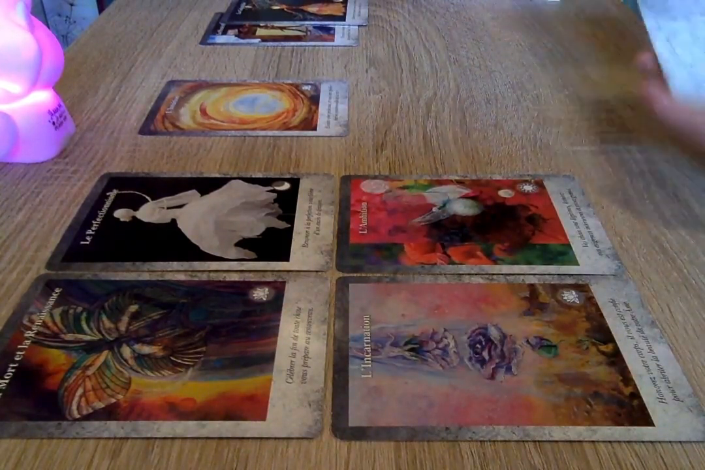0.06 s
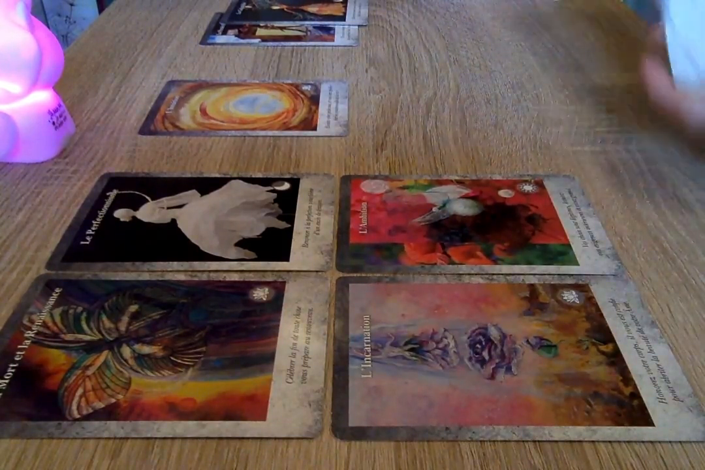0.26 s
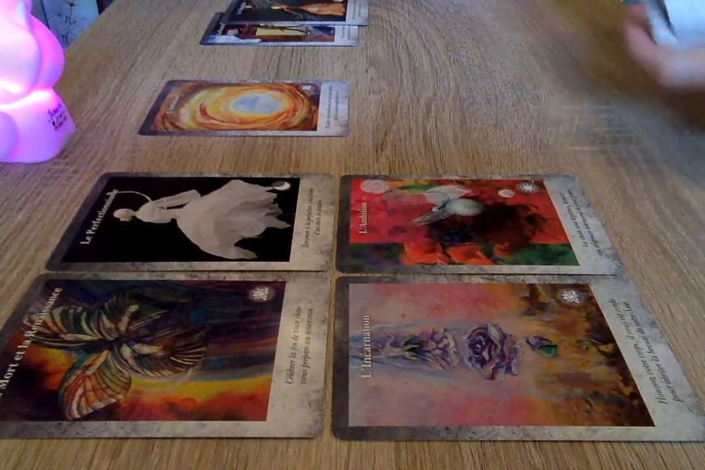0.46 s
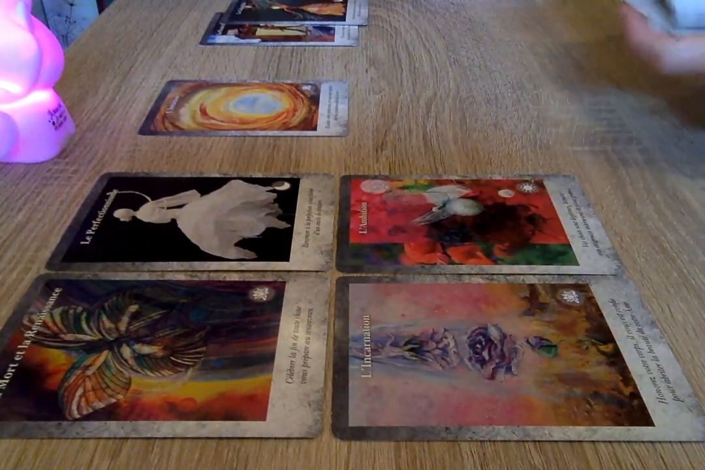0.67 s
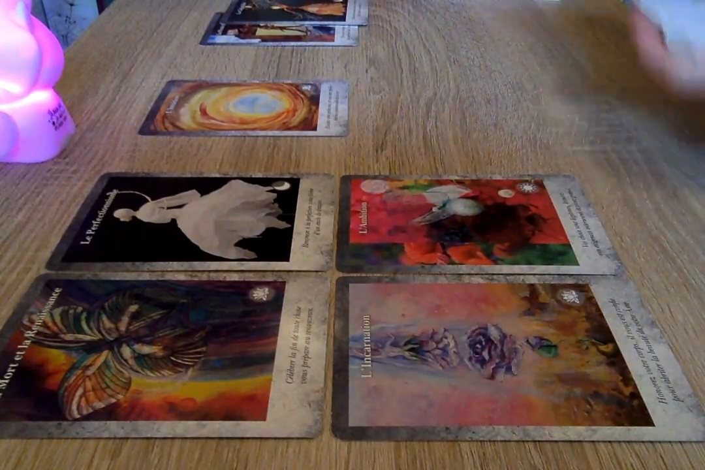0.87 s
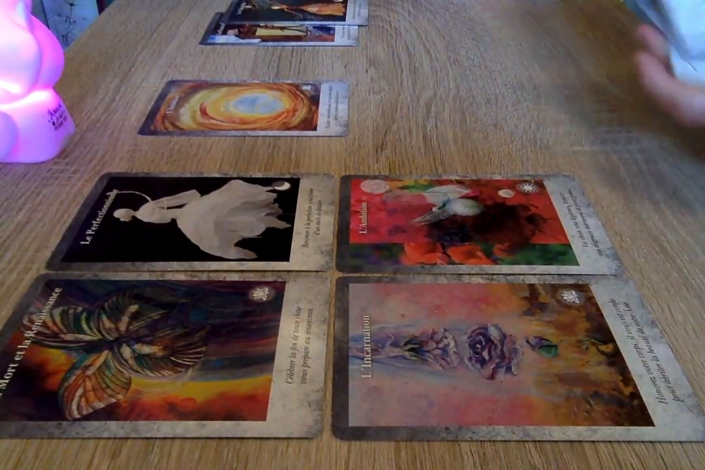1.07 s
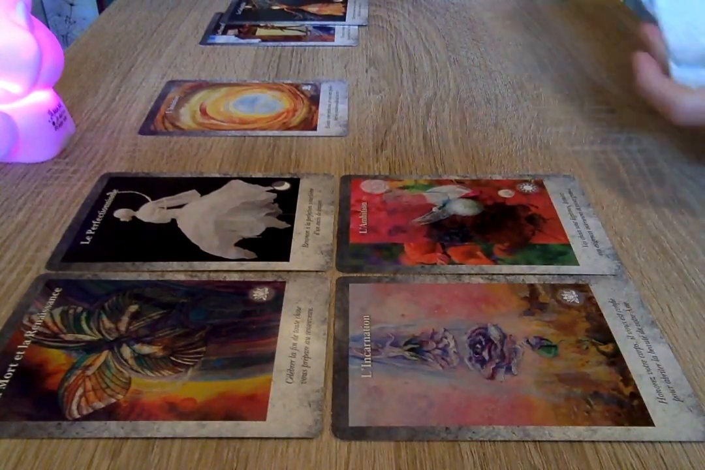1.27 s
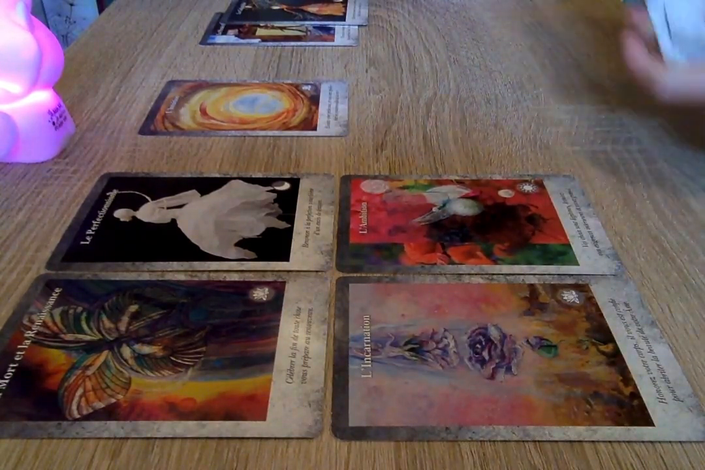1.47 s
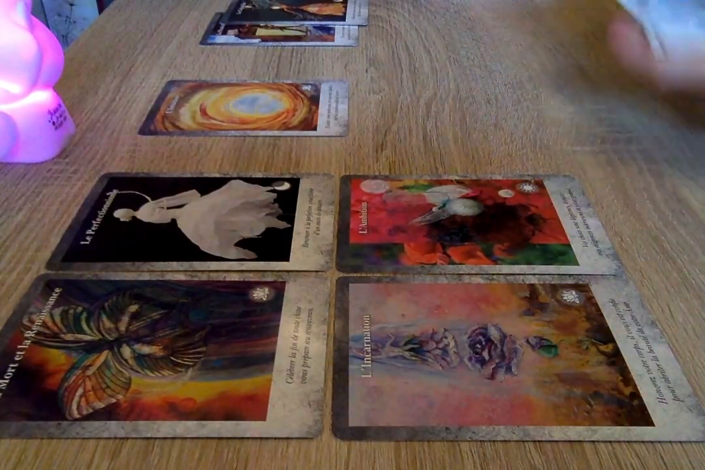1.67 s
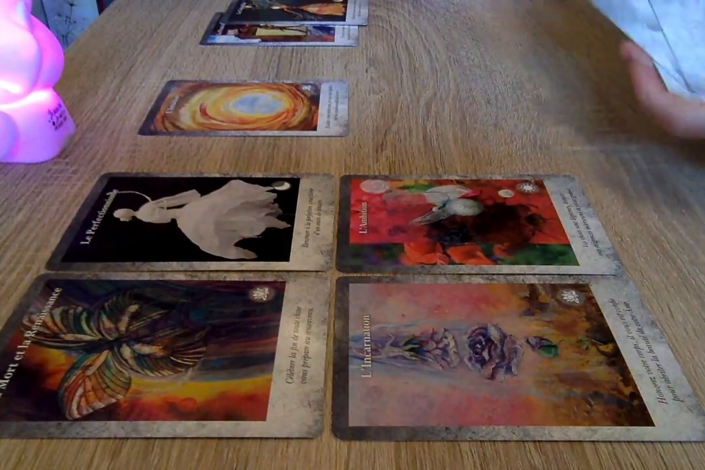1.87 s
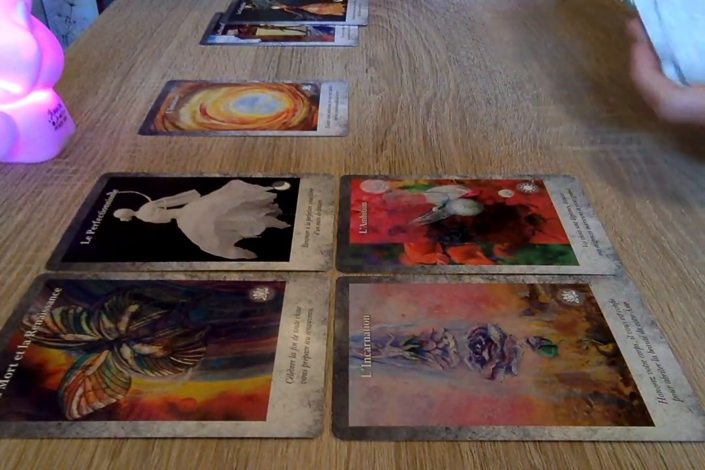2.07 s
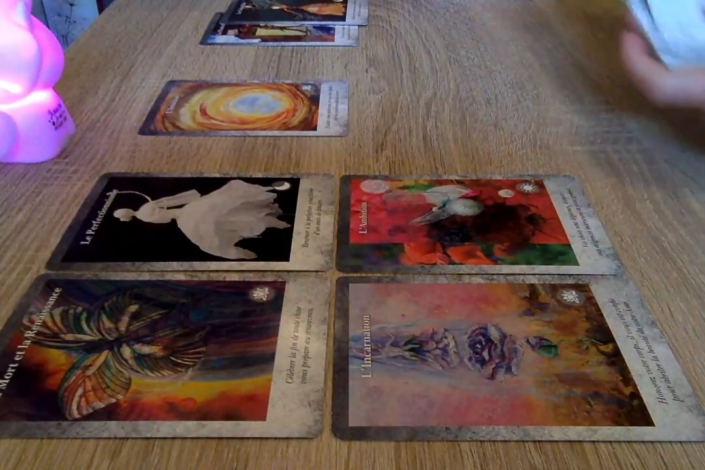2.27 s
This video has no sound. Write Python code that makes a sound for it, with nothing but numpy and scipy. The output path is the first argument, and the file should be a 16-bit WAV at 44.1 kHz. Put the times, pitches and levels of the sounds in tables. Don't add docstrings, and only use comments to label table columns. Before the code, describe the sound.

Cards shuffled overhand, close and dry, for about 2.3 seconds. Packets slide with brief hisses and slap down near 0.06, 0.3, 0.55 and 0.8 s, then at 1.04 s and with a sharp bright click at 1.15 s. Smaller flicks cluster from 1.25 to 1.45, a lull follows, then crisp snaps around 1.75-1.85, 2.0 and 2.1, fading to light touches. Short furnished-room response, nearly silent background.

```python
import sys
import numpy as np
from scipy import signal
from scipy.fft import rfft, irfft, next_fast_len
from scipy.io import wavfile
from scipy.ndimage import uniform_filter1d, map_coordinates

SR = 44100
rng = np.random.default_rng(int(sys.argv[2]) if len(sys.argv) > 2 else 0)


def invert_db(x):
    u = np.asarray(x, float) / 20
    return 10 ** u


def file_out(sig):
    cols = np.atleast_2d(sig).T
    lim = np.clip(cols, -1, 1)
    pcm = np.round(lim * 32767).astype(np.int16)
    wavfile.write(sys.argv[1], SR, pcm)


N = 102179

# f/Hz, level/dB
FLOOR_SPECTRUM = [(35, -44), (60, 4), (188, -9), (674, -11), (790, -12.5), (906, -8.5), (14000, -29)]
# f/Hz, time to fall 60 dB/s
ROOM_DECAY = [(150, 0.06), (1000, 0.4), (4000, 0.31), (14000, 0.25)]
# f/Hz, level/dB
ROOM_COLOUR = [(150, 6), (1000, 2), (4000, 4), (12000, -1)]
# t/s, peak level/dB, f/Hz
THUMPS = [(0.040, -37, 327), (0.057, -36.5, 290), (0.062, -35, 258), (0.283, -38, 225), (0.298, -25.5, 239),
          (0.308, -44, 305), (0.449, -50, 164), (0.548, -31, 222), (0.693, -41, 280), (0.700, -42.5, 210),
          (0.774, -32, 320), (0.79, -30.5, 206), (0.939, -49, 207), (0.946, -42, 148), (1.027, -41.5, 206),
          (1.037, -29.5, 346), (1.148, -29, 353), (1.219, -41, 194), (1.263, -40.5, 192), (1.28, -48, 220),
          (1.298, -40, 332), (1.333, -39.5, 258), (1.411, -41.5, 317), (1.437, -40, 346),
          (1.500, -41.5, 314), (1.731, -42.5, 343), (1.752, -42.5, 340), (1.821, -42.5, 293),
          (1.845, -40.5, 330), (1.857, -43.5, 318), (1.981, -53, 246), (2.101, -37.5, 250),
          (2.218, -43, 271), (2.242, -38.5, 240), (2.311, -42, 261)]
# t/s, peak level/dB, f/Hz
RINGS = [(.0434, -39, 715), (.0568, -36, 2340), (.0667, -26.5, 2150), (.0699, -32, 880),
         (.2139, -31.5, 925), (.2430, -35.5, 2050), (0.3, -22, 3400), (.3005, -27, 810),
         (.4639, -34.5, 2120), (.5485, -24, 2790), (.5614, -27, 950), (.6965, -33, 985), (.7082, -33, 2030),
         (.7510, -39, 1600), (.7590, -40, 1700), (.7697, -44, 1670), (.7952, -24, 2030), (.8003, -30, 2200),
         (.8130, -37, 1740), (.9372, -30, 2470), (.9415, -35, 1260), (1.0373, -27, 1820),
         (1.0413, -22, 1500), (1.1288, -31, 1860), (1.1403, -33, 750), (1.1440, -30, 2050),
         (1.1458, -29.5, 760), (1.1623, -35, 2170), (1.2416, -38, 3680), (1.2544, -32, 2050),
         (1.2723, -37, 1850), (1.2814, -36, 2260), (1.2947, -38, 2070), (1.2985, -44.5, 985),
         (1.2986, -36, 1960), (1.3331, -35, 2100), (1.333, -29.5, 2980), (1.4105, -34, 800),
         (1.4124, -34, 830), (1.4163, -45, 840), (1.4251, -40, 1950), (1.4393, -40, 1350),
         (1.4432, -34, 2770), (1.7290, -29, 3140), (1.7890, -26.5, 1900), (1.8286, -41, 2370),
         (1.8455, -21.5, 2490), (1.8558, -27, 1840), (1.8593, -29.5, 770), (1.9863, -31.5, 1010),
         (1.9864, -26, 2460), (1.9995, -43, 1960), (2.0465, -41, 900), (2.0458, -34, 2100),
         (2.0993, -21.5, 2250), (2.1004, -28.5, 1930), (2.1095, -52, 2150), (2.2901, -37.5, 1880),
         (2.3080, -45, 1300), (2.3160, -39.5, 1360)]
# t/s, body peak level/dB, body f/Hz, crack over body/dB, length/ms
LANDINGS = [(0.064, -24.5, 2200, 7, 4.3), (0.211, -22, 1680, -6.5, 6.2), (0.298, -21.5, 1630, -10, 4.2),
            (0.306, -20, 2100, 0.5, 4.8), (0.547, -23.5, 2630, -2.5, 5.9), (0.556, -20, 2400, -1.5, 6),
            (0.692, -27, 1530, -10, 5), (0.793, -16, 786, -8.5, 3.6), (0.934, -39.5, 2270, -12, 19),
            (1.036, -23, 784, -48, 8.4), (1.047, -27.5, 1710, -25, 5.7), (1.149, -19.5, 1730, -35, 4),
            (1.253, -28, 2200, -6.5, 7.7), (1.331, -24, 2080, -36.5, 4.5), (1.408, -41, 646, -4.5, 11),
            (1.727, -24, 675, -6, 4.5), (1.785, -25.5, 1150, -12, 8.4), (1.843, -20, 2500, -2, 2.96),
            (1.856, -29, 735, -1.5, 6.5), (1.985, -23, 2710, -14, 4.4), (2.043, -33, 775, -3.5, 4.6),
            (2.098, -23.5, 1980, -1, 3.6), (2.219, -32, 1870, 0.5, 6)]
# t/s, crack peak level/dB, body over crack/dB
TICKS = [(.463, -43, 1), (0.7118, -39, -14), (0.789, -17.5, 1), (.7946, -16, 8), (0.9558, -40.5, 14.5),
         (1.1501, -10.5, -14), (1.2148, -31, 5), (1.2407, -42, 7), (1.493, -26.5, -19.5), (1.501, -48, -28),
         (1.7455, -30, -22), (1.7571, -33, 9), (2.0067, -29, -15), (2.24, -28, -11)]
# t/s, peak level/dB, f/Hz, length/ms
NUDGES = [(0.006, -41.5, 1550, 70), (0.041, -33, 830, 49), (0.243, -32, 680, 11.5), (0.281, -30.5, 613, 14),
          (0.452, -40, 1270, 7.1), (0.492, -44.5, 1320, 21), (0.705, -35.5, 1900, 11),
          (0.757, -55, 1660, 3.2), (0.775, -23, 680, 9.3), (0.998, -45, 751, 15), (1.128, -31.5, 1100, 20),
          (1.281, -42, 1190, 23), (1.421, -36.5, 2050, 37), (1.748, -39, 580, 8.2),
          (1.978, -34, 1200, 10.4), (2.057, -36.5, 640, 15), (2.284, -38.5, 1200, 14)]
# f/Hz, level per Hz/dB
DECK_SPECTRUM = [(88, -16), (150, 1), (444, -0.5), (1120, -1.5), (2300, -3.5), (3320, -7.5), (5000, -30.5),
                 (6500, -17.5), (11000, -120)]
# f/Hz, level/dB
CRACK_SPECTRUM = [(2350, -22.5), (4300, -10.5), (5300, -5), (6300, -5.5), (7810, -5.5), (15500, -5)]
# start t/s, end t/s, end level/dB, swell from the start/dB
SLIDES = [(0, 0.063, -43, -6.5), (0.04, 0.062, -39.5, 3.5), (0.205, 0.241, -55.5, -13),
          (0.244, 0.299, -35, 31), (0.45, 0.472, -43, 3.5), (0.487, 0.54, -38.5, 42),
          (0.711, 0.716, -42.5, 21), (0.742, 0.804, -33, 24), (0.934, 0.954, -50.5, -32),
          (0.987, 1.04, -44.5, 8.5), (1.026, 1.058, -51, 9), (1.138, 1.153, -32, -1.5),
          (1.152, 1.186, -42.5, 11), (1.231, 1.304, -35, 10.5), (1.295, 1.334, -39, 7.5),
          (1.418, 1.45, -37.5, 1), (1.493, 1.505, -47, -11.5), (1.706, 1.719, -40, 4),
          (1.736, 1.776, -55, -13), (1.766, 1.814, -41.5, 22), (1.809, 1.845, -37, -6),
          (1.959, 1.992, -38, 11.5), (1.972, 2.046, -58.5, -5), (2.038, 2.066, -36, 37),
          (2.062, 2.1, -39.5, -3), (2.219, 2.238, -45, 2), (2.252, 2.297, -51, 8),
          (2.283, 2.315, -38.5, 20)]
# f/Hz, level/dB
HISS_SPECTRUM = [(2060, -35.5), (3500, -34.5), (4270, -14.5), (5250, -9.5), (7390, -3), (8010, -3),
                 (15500, -1.5)]
# f/Hz, level per Hz/dB
SCRAPE_SPECTRUM = [(88, 16), (150, 5), (524, -26.5), (1190, 4), (1470, -25), (2130, -6), (4000, -12.5),
                   (5200, -68.5), (8800, -120)]

FLOOR_DB = -63
ROOM_DB, ROOM_DELAY_S = -9.5, 0.003
THUMP_DB, THUMP_CYCLES = 7, 1.04
RING_DB, RING_CYCLES, RING_SAG = 0.65, 5, 0.08
BODY_DB, CRACK_DB, NUDGE_DB = -6.5, -3.5, -5
TICK_DB, TICK_BODY_DB, TICK_HZ, TICK_MS = -4.5, -8, 2100, 0.57
BODY_Q, BODY_SHARE_DB = 5.3, 1.5
SOFT_OVER_PITCH = 3.64
RAGGED_DB, RATTLE_DB = 2.5, 4.2
KNOCK_LEAD = 256
SCRAPE_DB, SCRAPE_GROWS = -10, 1
GRIT_DB, GRIT_PER_S, PATCH_DB = 3.5, 700, 1.6
TOUCH_S, LIFT_S, SWELL_BEND = 0.005, 0.0018, 2.28
EDGE_HZ, EDGE_PER_DB, EDGE_TOP_HZ = 3800, 0.3, 7600
BRIGHTER = 0.04
MIC_LOW_HZ, MIC_TOP_HZ, MIC_SHELF_DB = 96, 15900, -35
GATE_DB, GATE_SLOPE, GATE_S = -45.5, 0.62, 0.0059


def unit(x):
    return x / np.sqrt(np.mean(x ** 2) + 1e-20)


def along(points, hz):
    f, v = np.transpose(points)
    return np.interp(np.log(hz + 1), np.log(f + 1), v)


def filtered(x, response):
    m = next_fast_len(len(x) + 4096)
    spectrum = rfft(x, m) * response(np.fft.rfftfreq(m, 1 / SR))
    return irfft(spectrum, m)[:len(x)]


def noise(spectrum, size):
    return unit(filtered(rng.standard_normal(size), lambda hz: invert_db(along(spectrum, hz))))


def wobble(rate, size):
    knots = rng.standard_normal(size // 8)
    return map_coordinates(knots, [np.arange(size) * rate / SR])


def add(track, s, sound):
    part = track[round(s * SR):][:len(sound)]
    part += sound[:len(part)]


def noise_floor():
    return invert_db(FLOOR_DB) * noise(FLOOR_SPECTRUM, N)


def room(x):
    out, step = np.zeros(N), SR // 20
    for a in range(0, N, step):
        hz, t, z = signal.stft(rng.standard_normal(SR // 3), SR, nperseg=256)
        fall_db = 60 * t / along(ROOM_DECAY, hz)[:, None]
        fade = invert_db(along(ROOM_COLOUR, hz)[:, None] - fall_db)
        tail = signal.istft(z * fade, SR, nperseg=256)[1]
        answer = signal.fftconvolve(x[a:a + step], tail / np.linalg.norm(tail))
        add(out, a / SR + ROOM_DELAY_S, answer)
    return invert_db(ROOM_DB) * out


def thumps():
    out, t = np.zeros(N), np.arange(4096) / SR
    for s, db, hz in THUMPS:
        u = t * hz / THUMP_CYCLES
        push = 4 * u * np.exp(1 - 4 * u)
        swing = np.sin(2 * np.pi * hz * t * (1 - 0.2 * np.minimum(u, 2)))
        add(out, s, invert_db(db + THUMP_DB) * push * swing)
    return out


def rings():
    out, t = np.zeros(N), np.arange(1024) / SR
    for s, db, hz in RINGS:
        u = 4 * t * hz / RING_CYCLES
        ring = np.sin(2 * np.pi * hz * t * (1 + RING_SAG * (1 - np.minimum(u / 4, 2))))
        envelope = (u * np.exp(1 - u)) ** 2
        peak_lag = RING_CYCLES / 4 / hz
        add(out, s - peak_lag, invert_db(db + RING_DB) * envelope * ring)
    return out


def knock(body_db, hz, crack_db, ms, top_hz=SR):
    u = np.arange(-KNOCK_LEAD, 2816) / SR / (max(ms, 0.3) / 1000)
    u = np.clip(u, 0, 99)
    burst = np.clip(u / 0.099, 0, 1) * np.exp(-u ** 2.1)
    rattle = invert_db(0.28 * RATTLE_DB * np.array([wobble(928, len(u)) for _ in range(3)]))
    blows = rfft(rng.standard_normal(rattle.shape) * burst * rattle)
    blows = blows / np.sqrt(uniform_filter1d(np.abs(blows) ** 2, size=40) + 1e-9)
    f = np.fft.rfftfreq(len(u), 1 / SR)
    damping = 1j * f * hz / BODY_Q
    resonance = 1 + 2 * invert_db(BODY_SHARE_DB) * damping / (hz * hz - f * f + damping)
    softness = (1 + 1j * f / top_hz) ** 4
    body = irfft(blows[0] * invert_db(along(DECK_SPECTRUM, f)) * resonance / softness)
    patches = invert_db(RAGGED_DB * np.array([wobble(667, len(f)) for _ in range(2)]))
    crack = irfft((blows[1:] * patches).sum(0) * invert_db(along(CRACK_SPECTRUM, f)))
    return np.std(burst) * (invert_db(body_db) * unit(body) + invert_db(crack_db) * unit(crack))


def knocks():
    out, lead_s = np.zeros(N), KNOCK_LEAD / SR
    for s, db, hz, over_db, ms in LANDINGS:
        add(out, s - lead_s, knock(db + BODY_DB, hz, db + over_db + CRACK_DB, ms))
    for s, db, over_db in TICKS:
        add(out, s - lead_s, knock(db + over_db + TICK_BODY_DB, TICK_HZ, db + TICK_DB, TICK_MS))
    for s, db, hz, ms in NUDGES:
        add(out, s - lead_s, knock(db + NUDGE_DB, hz, db - 17, ms, SOFT_OVER_PITCH * hz))
    return out


def slides():
    t, grit = np.arange(N) / SR, invert_db(GRIT_DB * wobble(GRIT_PER_S, N))
    hiss = noise(HISS_SPECTRUM, N)
    scrape = noise(SCRAPE_SPECTRUM, N) * invert_db(RATTLE_DB * wobble(220, N))
    centres = 4000 * np.sqrt(2) ** (np.arange(9) / 2)
    bands = []
    for k in range(9):
        band = filtered(hiss, lambda hz: np.interp(hz, centres, np.arange(9) == k))
        bands.append(band * invert_db(PATCH_DB * wobble(90, N)))
    bands, centres = np.array(bands), centres[:, None]
    out = np.zeros(N)
    for start, end, db, swell_db in SLIDES:
        at = slice(round(start * SR), round(end * SR) + 1500)
        progress = np.clip((t[at] - start) / (end - start), 0, 1)
        below_db = swell_db * (1 - progress) ** SWELL_BEND
        touch = np.clip((t[at] - start) / TOUCH_S, 0, 1) ** 2
        lift = np.exp(-np.clip(t[at] - end, 0, 1) / LIFT_S)
        edge_hz = np.minimum(EDGE_HZ * np.exp(EDGE_PER_DB * below_db), EDGE_TOP_HZ)
        edge = 1 / np.sqrt(1 + (edge_hz / centres) ** 16)
        tilt = invert_db(BRIGHTER * (db - below_db + 42) * np.log2(centres / 9000))
        upper = (bands[:, at] * tilt * edge).sum(0) * invert_db(-below_db)
        lower = scrape[at] * invert_db(SCRAPE_DB - SCRAPE_GROWS * below_db)
        out[at] += invert_db(db) * touch * lift * (upper + lower)
    return out * grit


def scene():
    cards = thumps() + rings() + knocks() + slides()
    return (noise_floor() + room(cards) + cards)[None]


def top_cut(x):
    return signal.sosfilt(signal.butter(12, 16810, fs=SR, output="sos"), x)


def record(dry):
    def band(hz):
        low_cut = (1j * hz / (MIC_LOW_HZ + 1j * hz)) ** 4
        return low_cut * invert_db(MIC_SHELF_DB / (1 + np.exp((MIC_TOP_HZ - hz) / 60)))

    power = np.abs(uniform_filter1d(dry[0] ** 2, round(GATE_S * SR)))
    level_db = 10 * np.log10(power + 1e-12)
    gated = dry[0] * invert_db(GATE_SLOPE * np.clip(level_db - GATE_DB, -14, 0))
    mix = filtered(gated, band)[None]
    return top_cut(mix)


dry = scene()
out = record(dry)
file_out(out)
```